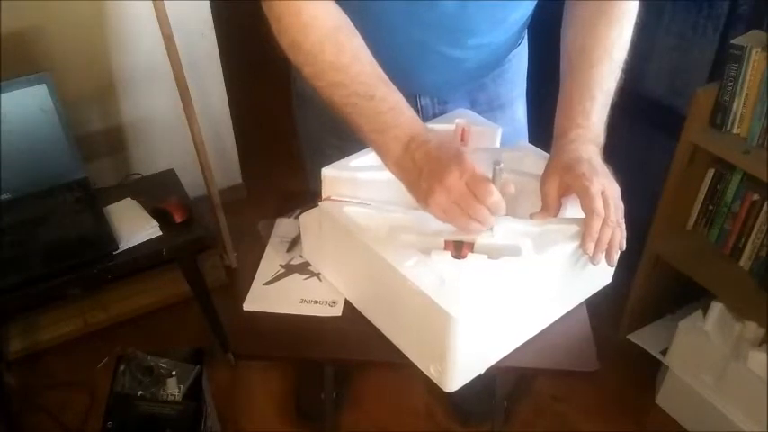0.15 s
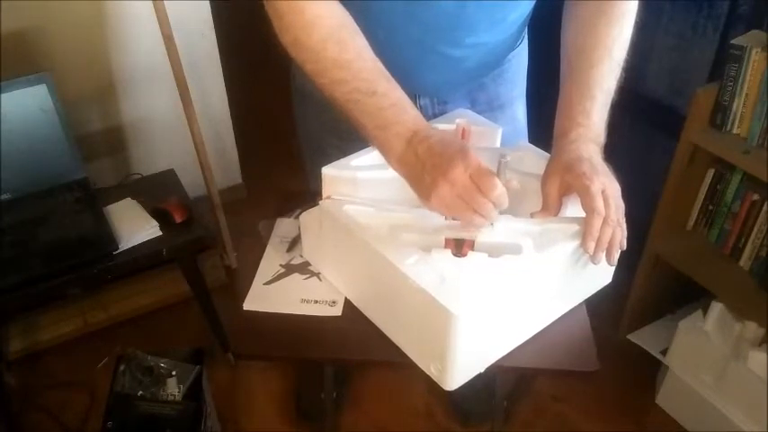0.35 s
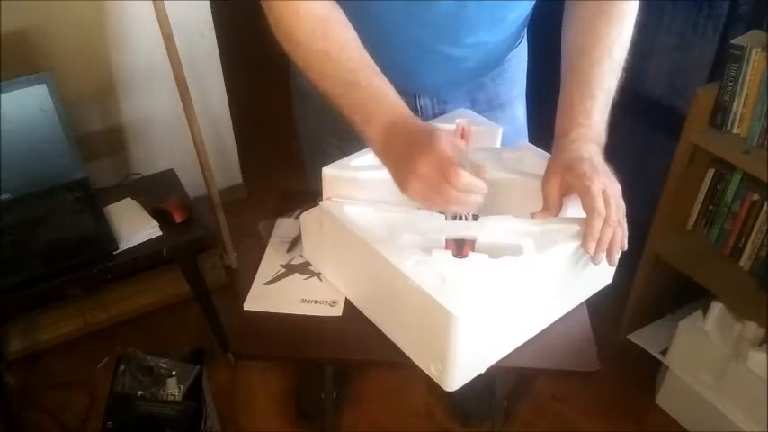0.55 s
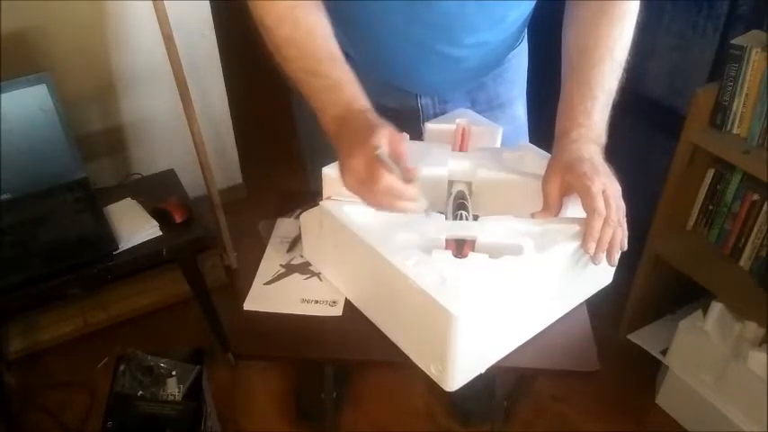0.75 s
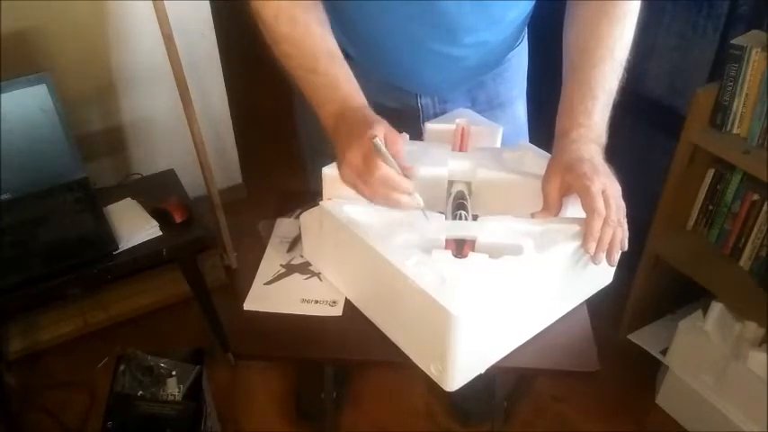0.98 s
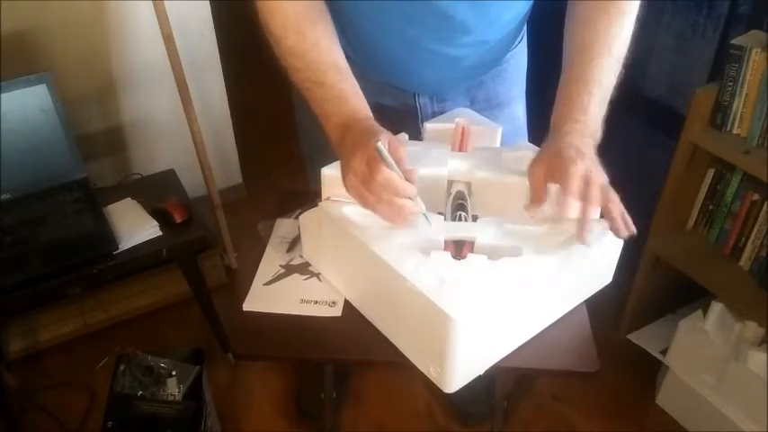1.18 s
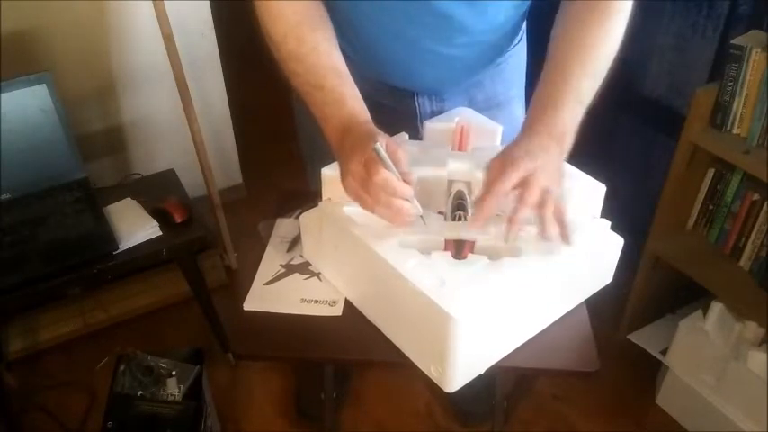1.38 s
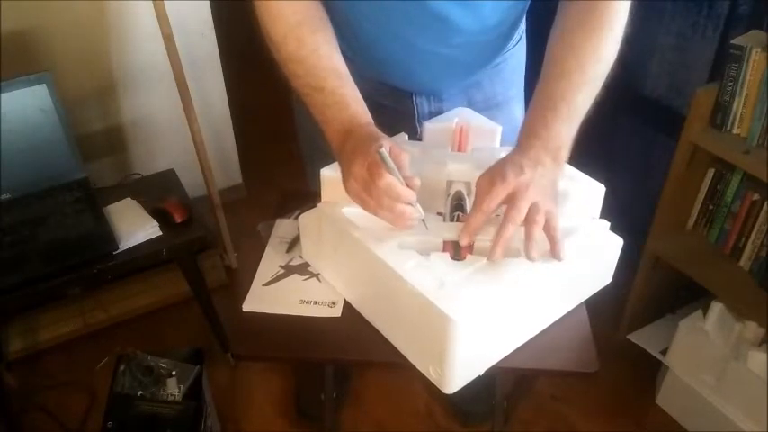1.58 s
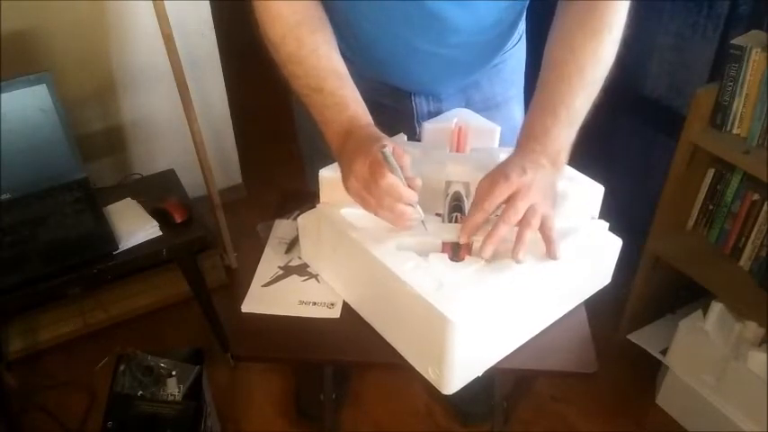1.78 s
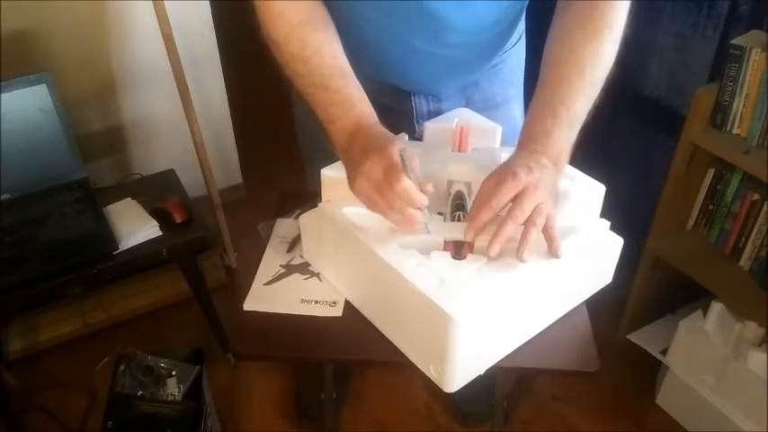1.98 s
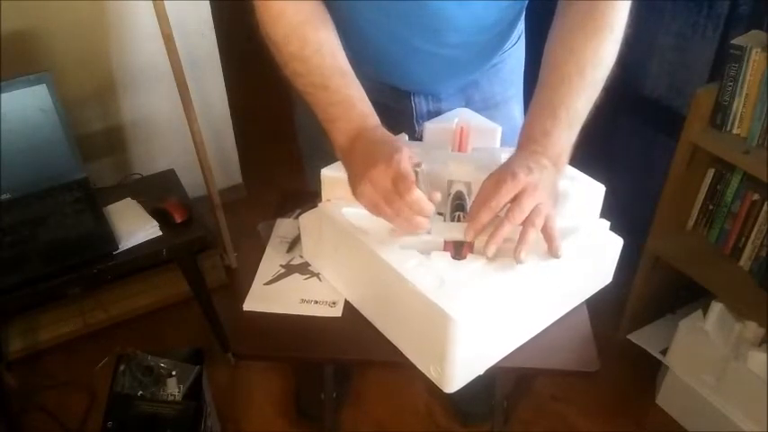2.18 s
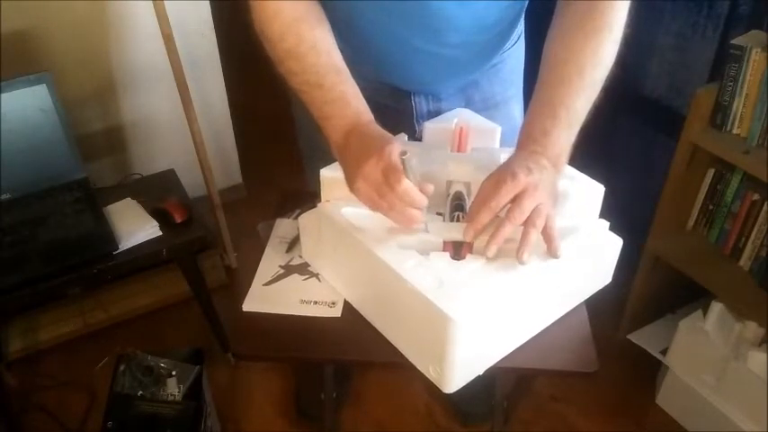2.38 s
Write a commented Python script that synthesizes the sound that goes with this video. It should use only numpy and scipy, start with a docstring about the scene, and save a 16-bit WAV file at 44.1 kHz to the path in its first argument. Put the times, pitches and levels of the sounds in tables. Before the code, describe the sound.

A knife scrapes through packing tape on a hollow foam box, starting at about 0.2 seconds and building to a cluster of crisp snaps near 0.55. After a pause with only faint room tone, light, uneven scratches resume at 1.1 seconds. The tape snaps sharply near 1.6 and 2.0, and a smaller scrape and tick follow around 2.25. Each sound has a short, tight small-room echo.

```python
"""A small furnished room, where a knife works through packing tape on a foam box.
The blade drags in stick-slip scrapes and the taut tape gives way in snaps; both ring the hollow box.
Two brief high rubs come off the foam. The room answers each sound with a short, tight tail,
and a faint steady bed of room tone lies underneath."""
import sys
import numpy as np
from scipy import signal
from scipy.fft import rfft, irfft
from scipy.io import wavfile
from scipy.ndimage import uniform_filter1d

SR = 44100
rng = np.random.default_rng(int(sys.argv[2]) if len(sys.argv) > 2 else 0)


def store_wav(level_fs):
    """Save 16-bit WAV to argv[1]."""
    pcm = np.round(np.clip(np.atleast_2d(level_fs), -1, 1) * 32767)
    wavfile.write(sys.argv[1], SR, pcm.T.astype(np.int16))


N = 108045

# room tone spectrum: f/Hz, level/dB
ROOM_TONE = [(18, -40), (30, -63), (187, -19), (299, -6.5), (432, -6.5), (492, -1.5), (532, -7), (747, -3),
             (1080, -7), (1400, -9.5), (2180, -11.5), (2620, -15.5), (2990, -17), (3400, -21),
             (15500, -28.5)]
# centres of the bass, middle, treble and top bands: f/Hz
TONE_BANDS = (380, 1100, 3800, 10000)
# blade strokes: t/s, length/s, start level/dB, end level/dB, bass/dB, treble/dB, top/dB
BLADE_STROKES = [(.18, 0.0385, -64, -54, 6, 10, 7), (0.228, 0.1, -58, -68.5, 4, 5, 11.5),
                 (0.342, 0.058, -75, -46, -5, 6, 11), (0.393, 0.036, -44.5, -61, 1, 21, -1),
                 (0.428, 0.081, -52, -55.5, -3.5, -3, 1), (0.504, 0.081, -55.5, -41.5, 0.5, 7.5, 5),
                 (0.549, 0.0098, -30, -53, -3, 18, 10), (0.56, 0.0073, -31.5, -30, -24, 10.5, 16),
                 (0.579, 0.02, -40, -63, 12, 11, -23), (1.113, 0.068, -58, -67, -2, 1, -1.5),
                 (1.164, 0.056, -63, -46.5, 2.5, 5.5, 3.5), (1.21, 0.2, -55, -75, 12, 3.5, 6.5),
                 (1.454, 0.19, -64.5, -63.5, 4, 6.5, -6), (1.557, 0.077, -55, -65, -27, 7, 2),
                 (1.681, .1, -65, -55, -4.5, -2, -1), (1.838, .14, -62, -62, -1.5, -3.5, 3.5),
                 (1.974, 0.041, -62, -49, -4, 3.5, 7), (2.028, 0.068, -46, -55.5, -7, 10, 6.5),
                 (2.084, 0.034, -55, -65, 9, -10, 11), (2.239, 0.039, -64.5, -48.5, 0, 5, 6),
                 (2.271, 0.019, -43.5, -56, 10.5, 8.5, 3)]
# tape snaps and blade ticks:
# t/s, level/dB, bass/dB, treble/dB, top/dB, tape ring f/Hz, ring lift/dB, tear decay/s
TAPE_SNAPS = [(0.2205, -42.5, 5, 4, 1, 898, 7, 0.0015), (.328, -46.5, 3.5, 4.5, 1.5, 1074, 11, 0.0013),
              (0.3937, -47, -7, 8, 1, 1060, 7, .002), (.413, -47.5, -5, 9, 5, 1813, 12.5, 0.0014),
              (.421, -52.5, 3.5, 1, 10, 1046, 6, .0015), (0.5437, -45, -19, 10, 7, 2470, 5, 0.003),
              (0.556, -36.5, -5, 13, 5.5, 1077, 6, 0.0027), (0.5767, -36, -4, -2.5, -8, 863, 4.5, 0.00087),
              (1.282, -58, 14, 12, -1, 530, 8.5, 0.0034), (1.533, -46, 1.5, 0.5, -7.5, 1094, 6, 0.0029),
              (1.535, -48, 0, -3.5, -13, 2750, 13, 0.0022), (1.6125, -33, 0.5, 2.5, 1.5, 1560, 3.5, 0.0018),
              (1.6242, -50, 1, -20, -6, 553, 14, .001), (1.749, -56, 2, 4.5, 2, 1150, 3, 0.0049),
              (1.8355, -59.5, -0.5, 10.5, 11, 6000, 13, .0015),
              (1.907, -58.5, -13, 0, -10, 1090, 0, 0.0014), (1.958, -56.5, -20, 3, 2, 2700, 9, 0.0018),
              (2.0158, -33, 6, -0.5, 3, 962, 4.5, 0.0019), (2.021, -39, -1.5, -2.5, -2, 773, 13, 0.0028),
              (2.125, -49, -2.5, -1.5, -2, 1390, 1, 0.00092), (2.232, -57.5, -13, 0, -2, 940, 4, 0.0025),
              (2.2677, -47.5, -7, 0.5, 6, 1650, 2.5, 0.0012)]
# rubs on the foam: t/s, length/s, level/dB, low edge f/Hz, high edge f/Hz
FOAM_RUBS = [(0.434, 0.0028, -52.5, 5200, 6350), (1.379, 0.0062, -52.5, 2380, 4430)]
# colour of tape on foam: f/Hz, level/dB
FOAM_COLOUR = [(30, -40), (110, -35), (200, -28), (280, -10.5), (520, 0), (1000, 2.5), (1800, -3.5),
               (2900, -5.5), (3500, -11.5), (6900, -15.5), (7600, -23.5), (15500, -30.5)]
# resonances of the hollow box: f/Hz, width/Hz, lift/dB
BOX_MODES = [(261, 20.5, 6), (545.6, 39, 4.5), (788, 39, 3.5), (952, 63, 5.5), (1063, 53, 6), (1339, 46, 7),
             (1590, 38, 3), (1802, 210, 6.5), (2599, 42, 6.5), (2640, 55, 2), (3038, 55, 4), (4513, 57, 6)]


def undb(db):
    """Decibels to gain."""
    return 10 ** (np.asarray(db) / 20)


def unit(x):
    """Scale to unit energy."""
    return x / np.sqrt(np.sum(x ** 2) + 1e-20)


def along(points, hz):
    """Read (Hz, value) points on a log-frequency axis."""
    p = np.array(points)
    return np.interp(np.log(np.maximum(hz, 1)), np.log(p[:, 0]), p[:, 1])


def whiten(x, bands=160):
    """Even out the broad colour of a random burst, keeping its fine grain."""
    spectrum = rfft(x, 4 * len(x))
    power = uniform_filter1d(np.abs(spectrum) ** 2, max(len(spectrum) // bands, 1))
    return unit(irfft(spectrum / np.sqrt(power + 1e-20))[:len(x)])


def add(out, at, x):
    """Mix a sound in at a time in seconds."""
    i = int(at * SR)
    out[i:i + len(x)] += x[:len(out) - i]


def room_tone(level_db=-68.5):
    """A faint steady bed of room noise and hiss."""
    colour = undb(along(ROOM_TONE, np.fft.rfftfreq(N, 1 / SR)))
    noise = irfft(rfft(rng.standard_normal(N)) * colour, N)
    return unit(noise) * np.sqrt(N) * undb(level_db)


def blade_scrapes(slips_per_s=800, scatter_db=2, fade_s=0.0064):
    """The blade sticks and slips at uneven intervals while the pressure rises or falls."""
    out = np.zeros(N)
    for at, length, start_db, end_db, *tone in BLADE_STROKES:
        n = int(length * SR)
        t = np.arange(n) / SR
        gap, size = rng.standard_normal((400, 2)).T
        when = (np.cumsum(np.exp(.7 * gap)) / slips_per_s * SR).astype(int)  # log-normal gaps
        kicks = undb(scatter_db * size) * rng.choice([-1, 1], len(size))
        slips = np.zeros(n)
        np.add.at(slips, when[when < n], kicks[when < n])
        fade = np.clip(np.minimum(t, length - t) / fade_s, 0, 1)
        pressure = undb(np.linspace(start_db, end_db, n)) * fade
        drag = unit(slips) * np.sqrt(n) * pressure
        add(out, at, room(foam_box(drag, *tone)))
    return out


def foam_box(drive, bass, treble, top, rings=(), size=4096):
    """The taped box rings, shaded by where the blade bites (dB against the middle band)."""
    hz = np.fft.rfftfreq(size, 1 / SR)
    shade = along(list(zip(TONE_BANDS, (bass, 0, treble, top))), hz)
    peaks = sum(db / (1 + (2 * (hz - f) / width) ** 2) for f, width, db in [*BOX_MODES, *rings])
    cepstrum = irfft(np.log(undb(along(FOAM_COLOUR, hz) + shade + peaks)))
    # minimum phase: a crisp attack with the ring after it
    cepstrum[1:size // 2] *= 2
    cepstrum[size // 2 + 1:] = 0
    impulse = unit(irfft(np.exp(rfft(cepstrum))))
    return signal.fftconvolve(drive, impulse)


def room(x, early_s=0.0069, early_db=1, t60_s=0.24, tail_db=-.5):
    """Direct sound, scatter off the table and nearby things, and a short tail; each touch has its own."""
    t = np.arange(SR // 3) / SR
    early = unit(np.exp(-t / early_s) * (t > .001))
    tail = unit(undb(-60 * t / t60_s) * (1 - np.exp(-t / 0.0033)))
    impulse = rng.standard_normal(len(t)) * np.hypot(undb(early_db) * early, undb(tail_db) * tail)
    impulse[0] += 1  # direct sound
    return signal.fftconvolve(x, whiten(impulse))


def tape_snaps(rise_share=0.74, ring_width_hz=176):
    """The taut tape gives way in a burst of tiny tears, a few ms long, and rings briefly."""
    out, t = np.zeros(N), np.arange(SR // 40) / SR
    for at, db, bass, treble, top, ring_hz, ring_db, decay in TAPE_SNAPS:
        envelope = np.exp(-t / decay) * (1 - np.exp(-t / (rise_share * decay)))
        tear = whiten(rng.standard_normal(len(t)) * envelope)
        snap = foam_box(tear, bass, treble, top, rings=[(ring_hz, ring_width_hz, ring_db)])
        add(out, at, unit(room(snap)) * undb(db) * np.sqrt(len(t)))
    return out


def foam_rubs():
    """Brief high rubs on the foam, too light to ring the box."""
    out, t = np.zeros(N), np.arange(SR // 50) / SR
    for at, length, db, low_hz, high_hz in FOAM_RUBS:
        friction = rng.standard_normal(len(t)) * np.sin(np.pi * np.minimum(t / length, 1))
        band = signal.butter(3, [low_hz, high_hz], "bandpass", fs=SR, output="sos")
        rub = signal.sosfilt(band, friction)
        add(out, at, unit(room(rub)) * np.sqrt(length * SR) * undb(db))
    return out


def scene():
    """Knife, tape and box over the room tone, in mono."""
    return (tape_snaps() + blade_scrapes() + foam_rubs() + room_tone())[None]


def record(dry, cutoff_hz=15900):
    """A steep low-pass trims the very top."""
    return signal.sosfilt(signal.ellip(8, .2, 70, cutoff_hz, fs=SR, output="sos"), dry)


dry = scene()
out = record(dry)
store_wav(out)
```